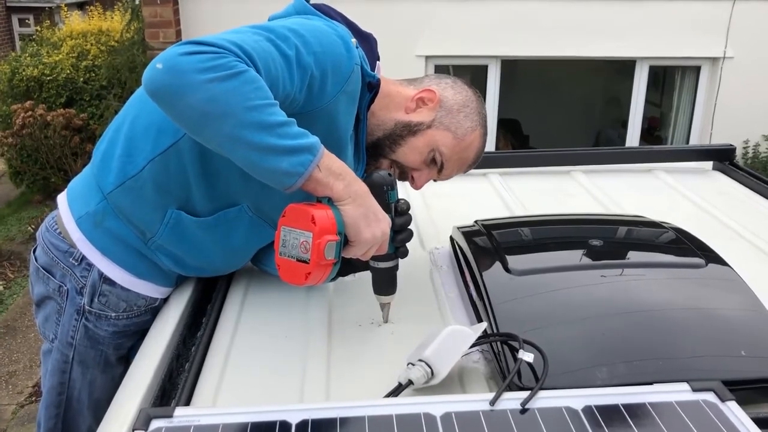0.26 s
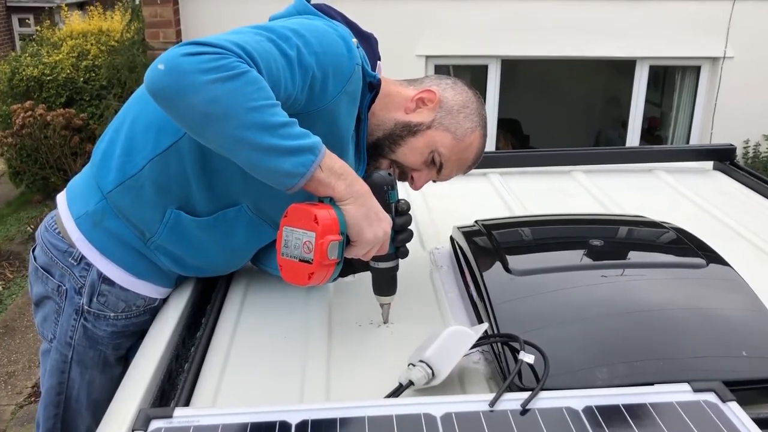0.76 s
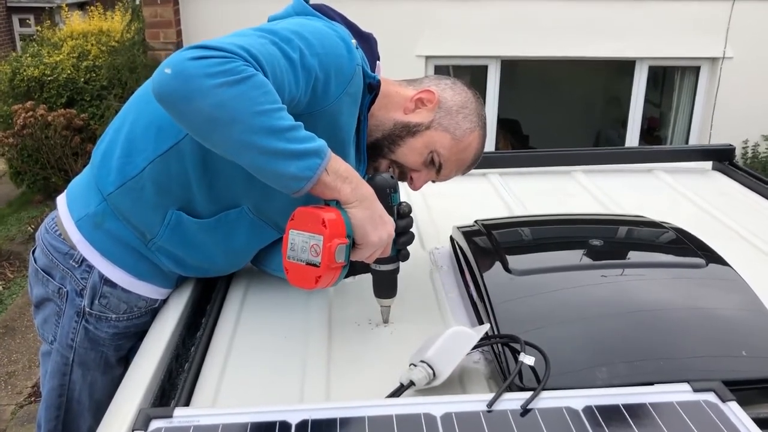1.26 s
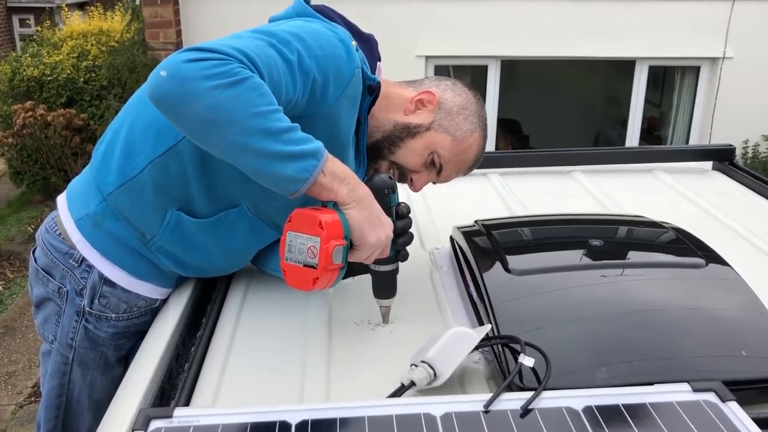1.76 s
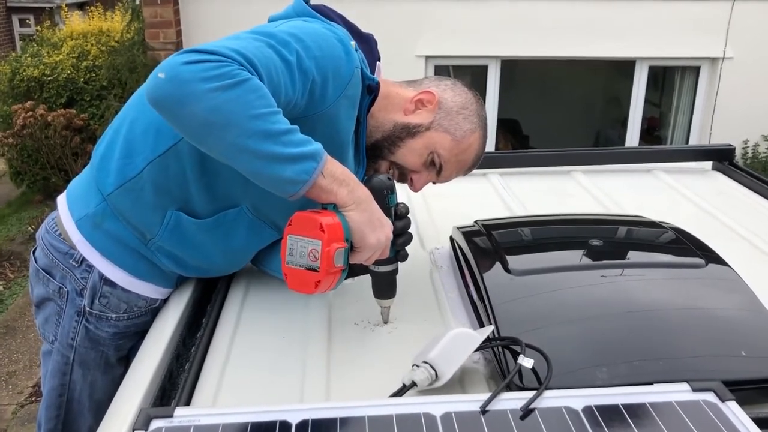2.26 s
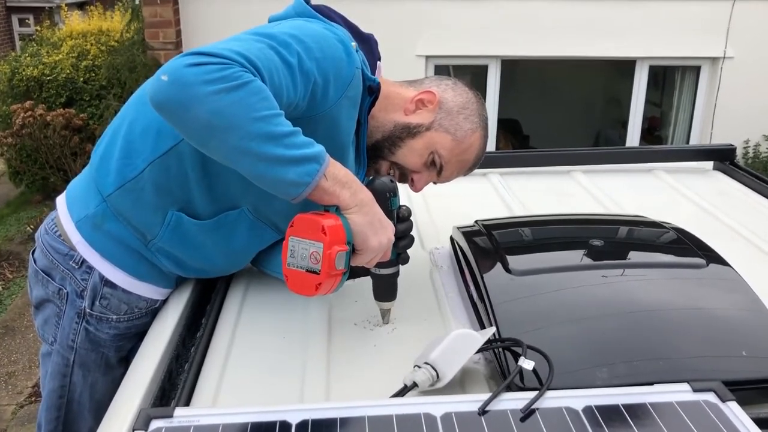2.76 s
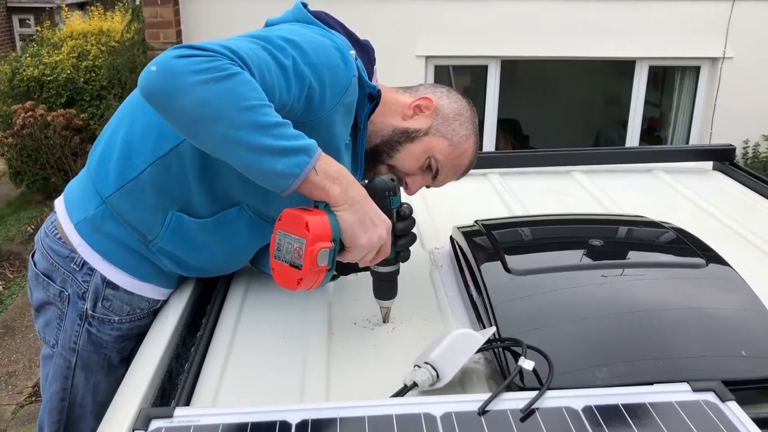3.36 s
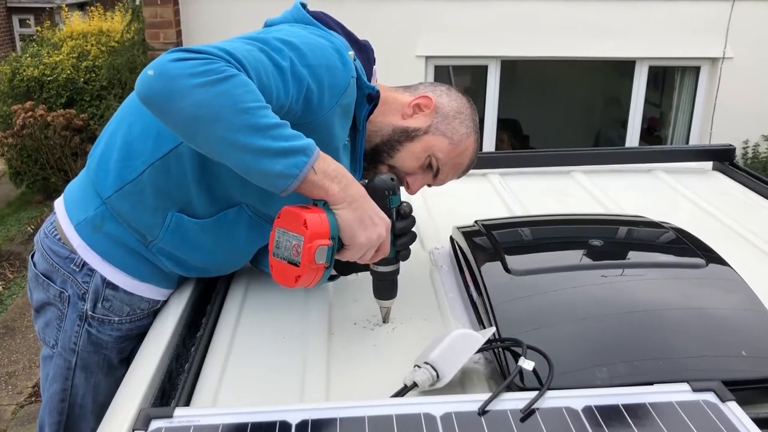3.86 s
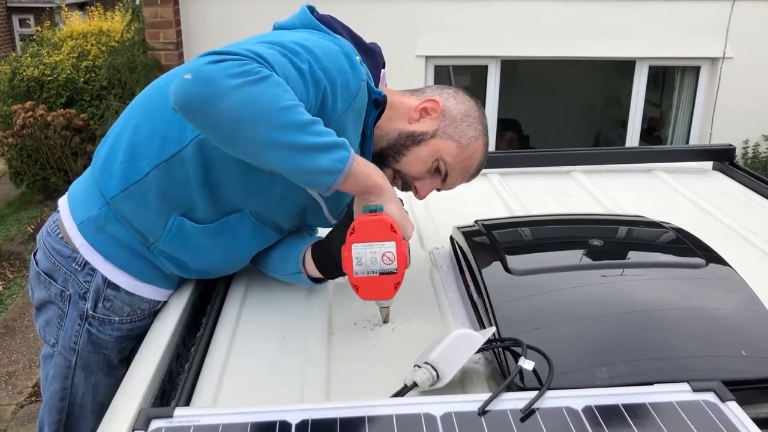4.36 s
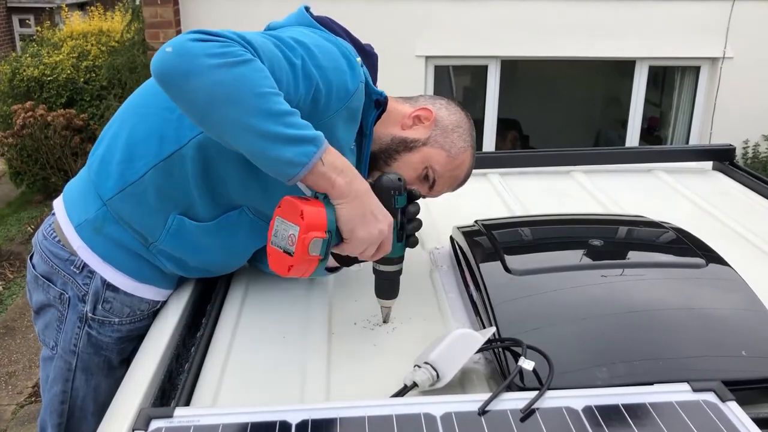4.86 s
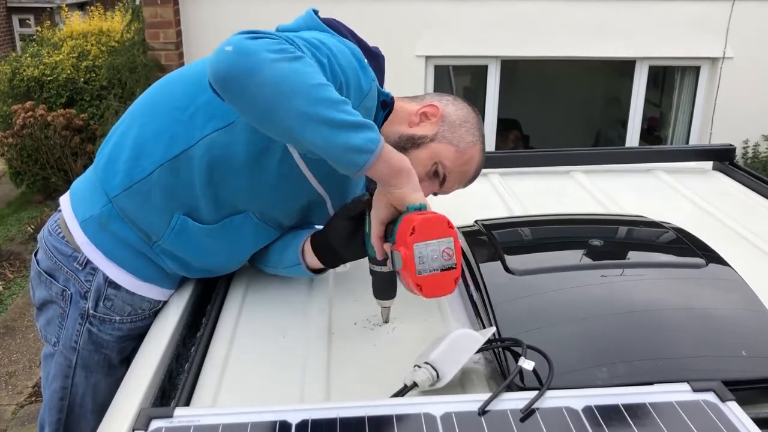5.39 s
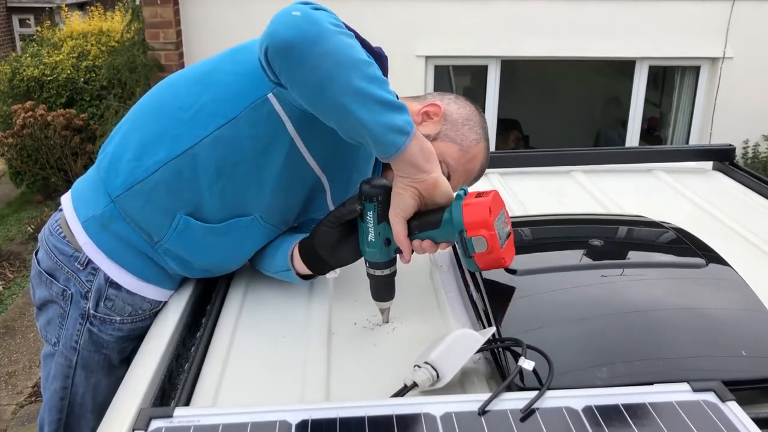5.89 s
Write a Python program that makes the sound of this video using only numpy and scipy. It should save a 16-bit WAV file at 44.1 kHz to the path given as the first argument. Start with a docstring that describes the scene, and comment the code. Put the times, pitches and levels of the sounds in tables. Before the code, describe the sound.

A cordless drill whines and grinds through a booming sheet-steel roof, snagging twice, then stops; a bird sings as the stuck bit knocks and scrapes.

```python
"""First a cordless drill drives a stepped bit through a steel van roof: its gears whine as wavering mesh
tones, the cut grinds as noise made of chips, and the panel booms through resonances struck by the flutes.
It stalls twice as a step snags, near 1.1 s and 2.7 s, then stops at 3.06 s. Afterwards the bit is twisted
free with thumps of decaying-pitch-free sine bursts and scrapes of noise, while a songbird sings in gliding
sine notes. A distant wash of traffic, shaped noise with thin tones, lies under it all."""
import sys
import numpy as np
from scipy import signal
from scipy.fft import rfft, irfft
from scipy.io import wavfile
from scipy.ndimage import uniform_filter1d

SR = 44100
rng = np.random.default_rng(int(sys.argv[2]) if len(sys.argv) > 2 else 0)


def pcm_store(signal):
    """Save signal as 16-bit PCM."""
    levels = np.round(np.clip(np.atleast_2d(signal), -1, 1) * 32767)
    wavfile.write(sys.argv[1], SR, levels.astype(np.int16).T)


N = 270333

# Colour of the distant traffic. Each row: frequency in Hz, relative level in dB per Hz.
TRAFFIC_SPECTRUM = [(25, -35), (49, -3), (117, -6), (170, 0), (326, -14.5), (560, -14.5), (780, -12),
                    (1050, -12.5), (1350, -13.5), (2200, -17.5), (2800, -22), (5000, -27), (8000, -39),
                    (16000, -59.5)]
# Thin far tones. Each row: frequency in Hz, mean peak level in dB against the wash.
FAR_TONES = [(549.1, -14.5), (694.4, -17), (952.8, -13.5), (990.5, -12), (1061, -11), (1098, -18.5),
             (1136, -7.5), (1174, -12), (1540, -15), (1830, -22), (2159, -13.5)]
# Slow fader of the traffic. Each row: time in seconds, mean level in dB.
TRAFFIC_LEVEL = [(3.2, -62.5), (3.62, -66), (4.24, -63), (4.91, -62), (5.39, -62), (5.7, -66), (6.13, -71)]
# Bird notes. Each row: start in seconds, length in seconds, start, middle and end pitch in Hz,
# mean peak level in dB, buzz depth in Hz.
BIRD_NOTES = [(3.239, 0.03, 4280, 4330, 4190, -75, 100), (3.29, 0.025, 4260, 4150, 3900, -64, 100.6),
              (3.894, 0.1, 4470, 4730, 4690, -67.5, 58.2), (4.064, .09, 5290, 5100, 5200, -64, 497),
              (4.087, .012, 5990, 6800, 7450, -67, 80), (4.102, 0.021, 7500, 6500, 5860, -51.5, 60.3),
              (4.12, 0.044, 3950, 4170, 4130, -66, 60), (4.177, 0.022, 4730, 4340, 3800, -59, 100),
              (4.201, 0.039, 6020, 5840, 6140, -55.5, 40), (4.233, 0.033, 5940, 5260, 5240, -49, 150),
              (4.258, 0.058, 5300, 5490, 5350, -51.5, 350), (4.315, 0.03, 5330, 6000, 5230, -51, 352),
              (4.334, 0.026, 5500, 6300, 5520, -56, 451), (4.37, 0.06, 5800, 5800, 6200, -65, 351),
              (4.417, .02, 3810, 3390, 3020, -75, 80), (4.447, 0.013, 3900, 3475, 2990, -72, 79.2),
              (4.552, 0.017, 3850, 3480, 3030, -62, 60.4), (4.572, .015, 4450, 3770, 3200, -60, 60),
              (4.614, 0.014, 4080, 4280, 4400, -62, 60.3), (4.618, 0.08, 3440, 3300, 3340, -65, 150),
              (4.658, 0.0071, 3700, 4600, 5300, -46.5, 60), (4.661, 0.071, 5280, 5280, 5380, -45.5, 59.3),
              (4.695, 0.01, 5140, 4340, 3580, -44, 60), (4.705, 0.074, 5100, 4900, 5050, -50, 493),
              (4.718, 0.032, 3590, 4180, 4870, -46, 60), (4.74, 0.016, 3750, 4850, 3700, -34.5, 60),
              (4.792, 0.03, 4710, 4740, 4700, -58, 251), (4.883, 0.0148, 5880, 7000, 7400, -46, 60),
              (4.903, 0.019, 7500, 7600, 7600, -56, 100), (4.917, 0.0062, 5730, 6650, 7560, -39, 60),
              (4.885, 0.049, 3600, 3380, 3520, -55, 250), (4.989, 0.016, 4180, 4760, 3790, -57, 60.6),
              (5.005, .04, 3710, 4330, 4090, -45.5, 60), (5.037, 0.011, 4360, 4270, 3680, -43.5, 60.3),
              (5.083, .016, 3070, 3700, 4400, -58.5, 30), (5.092, 0.016, 4440, 3880, 2930, -62, 30),
              (5.192, 0.015, 5570, 5400, 5800, -54.5, 99.3), (5.201, 0.11, 5510, 5390, 5200, -44, 40.3),
              (5.892, 0.028, 3980, 4170, 4120, -72, 59.4), (5.948, 0.074, 3610, 3350, 3520, -62, 250)]
# The panel pops or is bumped. Each row: start in seconds, level in dB, length in seconds, pitch in Hz.
THUMPS = [(1.081, -19, 0.032, 118), (1.108, -37.5, 0.13, 62.4), (1.28, -30.5, 0.068, 123.5),
          (2.702, -16.5, 0.04, 130.5), (2.725, -36, 0.066, 70.6), (3.38, -57, 0.053, 200),
          (4.71, -37, 0.052, 225), (4.885, -54.5, 0.043, 202), (5.27, -60, 0.044, 151),
          (6.07, -61.5, 0.076, 123.3)]
# The stuck bit scrapes in its hole. Each row: start in seconds, level at the start of its fade in dB,
# length in seconds.
SCRAPES = [(4.705, -45, 0.016), (4.709, -50.5, 0.1), (4.898, -56.5, 0.066), (5.214, -60.5, 0.13)]

# Mix of the roof panel. Each row: time in seconds, boom in dB, low flex in dB, rattle in dB.
ROOF_LEVELS = [(0.0, -24, -57, -41.5), (0.3, -24, -45.5, -36), (0.45, -29, -42, -34),
               (0.48, -27.5, -29, -38), (0.71, -25.5, -35, -39), (0.85, -30.5, -26.5, -38.5),
               (1.06, -40, -46, -46.5), (1.2, -33, -47.5, -48.5), (1.5, -30.5, -52.5, -44),
               (2.0, -30, -46, -41), (2.2, -31, -29.5, -47), (2.5, -30.5, -43, -43), (2.75, -41, -48, -52),
               (2.85, -35.5, -41, -49), (3.06, -36, -48.5, -47.5)]
# The bit jerks and the panel rings out. Each row: time in seconds, boom swell in dB, rattle swell in dB.
JOLTS = [(1.162, 10.5, -14), (1.262, 6.5, 8), (1.502, 8.5, 11.5), (1.588, 5, 10), (1.71, 2.5, 8.5),
         (1.82, 7.5, 5.5), (1.945, 6, -1), (2.018, 13, -3), (2.09, 2, 18), (2.125, 5.5, 2.5),
         (2.224, 7.5, -7.5), (2.26, 2, 17.5), (2.355, 1.5, 12.5), (2.821, 3.5, 14)]
# How regular the knocking is. Each row: time in seconds, share from 0 to 1.
STEADINESS = [(0, .93), (1, .9), (1.1, .6)]
# Slow flexing of the sheet. Each row: mode in Hz, pole width in Hz, relative level in dB.
FLEX_MODES = [(114, 27, -16), (163.5, 24, -8), (233, 89, 13.5)]
# Chatter of the sheet. Each row: mode in Hz, pole width in Hz, relative level in dB.
RATTLE_MODES = [(898, 100, -3), (950, 63, 1), (1069, 50, 3.5), (1316, 79, -7.5), (1540, 67, -9.5)]
# The panel's second mode. Each row: time in seconds, centre in Hz, level in dB against the low mode.
SECOND_MODE = [(0, 604, -6.5), (1.0, 558, -5), (1.15, 600, -7.5), (2.1, 614, -8.5), (3.06, 586, -5)]
# Wide shudder of the van body. Each row: frequency in Hz, relative level in dB per Hz.
RUMBLE_SPECTRUM = [(30, -40.5), (60, -17), (120, -1.5), (450, -8.5), (900, -10), (1500, -22)]

# The cut goes quiet in each stall. Each row: time in seconds, grinding in dB, swarf sizzle above it in dB.
CUT_LEVELS = [(0.0, -21.5, -16), (1.0, -23, -11), (1.04, -27.5, -15), (1.3, -25.5, -10), (1.48, -24, -10),
              (1.62, -22, -5.5), (1.98, -20, -2), (2.46, -24, -7.5), (2.61, -26.5, -2.5),
              (2.67, -28.5, -13.5), (2.81, -27.5, -5), (3.0, -23, -7.5), (3.06, -33.5, -25.5)]
# Colour of the grinding. Each row: frequency in Hz, relative level in dB per Hz.
GRIND_SPECTRUM = [(700, -24), (1260, -17.5), (1580, -16.5), (2200, -17.5), (2400, -7), (2840, 0),
                  (3110, -4.5), (3550, -8), (4500, -2), (5400, -8), (6300, -2), (7400, -6), (9000, -15.5),
                  (12300, -20.5), (16000, -23)]
# Colour of the swarf sizzle. Each row: frequency in Hz, relative level in dB per Hz.
SIZZLE_SPECTRUM = [(9000, -18), (10500, -6), (12500, -21), (14000, -7.5), (15000, 2), (16000, -1)]
# Hardest catches of the edge. Each row: start in seconds, surge size in dB against a push of 1,
# fall time in seconds.
BITES = [(0.36, 2, 0.006), (0.621, -2, 0.019), (0.654, -3.5, 0.0087), (0.704, -4, 0.02),
         (0.798, -4.5, 0.014), (0.979, -8, 0.026), (1.148, -6, 0.015), (1.235, 6.5, 0.01),
         (1.273, -3.5, 0.012), (1.322, 5.5, 0.026), (1.445, -6.5, 0.0098), (1.487, 4.5, 0.022),
         (1.544, 5, 0.01), (1.561, 2, 0.019), (1.688, -4, 0.023), (1.728, -2.5, 0.026), (1.787, -2, 0.012),
         (1.817, 3.5, 0.0061), (1.874, 0.5, 0.0097), (1.97, -4, 0.019), (2.043, -2, 0.02),
         (2.15, -0.5, 0.031), (2.253, 3.5, 0.0084), (2.293, -4.5, 0.014), (2.343, 3.5, 0.015),
         (2.492, -2.5, 0.017), (2.536, 0.5, 0.03), (2.589, 6, 0.016), (2.812, 15.5, 0.0077),
         (2.845, 3.5, 0.017), (3.042, 6.5, 0.015)]
# The edge skips free and the tearing dips. Each row: time in seconds, depth in dB.
LULLS = [(1.475, -4), (1.562, -5), (1.686, -7.5), (1.77, -3.5), (1.862, -10), (1.95, -10), (2.035, -8),
         (2.125, -3.5), (2.195, -4.5), (2.285, -3), (2.8, -2.5), (3.03, -8)]

# The gearbox sags under load, stalls twice with a rebound and hunts before the second stall.
# Each row: time in seconds, mesh pitch in Hz, basic whine level in dB.
GEARS = [(0.0, 4705, -25.5), (0.77, 4028, -28), (0.99, 3735, -43), (1.04, 2566, -23), (1.065, 2351, -30.5),
         (1.085, 2622, -33.5), (1.11, 2956, -27.5), (1.14, 2763, -28.5), (1.17, 3131, -32),
         (1.23, 3641, -32), (1.38, 4196, -27.5), (1.48, 4330, -27.5), (1.7, 4192, -27), (2.05, 4122, -31.5),
         (2.13, 3950, -39), (2.34, 3773, -38.5), (2.39, 3227, -36), (2.43, 3674, -32), (2.45, 3190, -33),
         (2.49, 3580, -33), (2.51, 3350, -36), (2.54, 3560, -32), (2.59, 3501, -37.5), (2.64, 2815, -27.5),
         (2.675, 1990, -27), (2.69, 2080, -28), (2.718, 2868, -29), (2.76, 2652, -28.5), (2.8, 3338, -38.5),
         (2.86, 4115, -31), (2.97, 4890, -28.5), (3.05, 4676, -57)]
# Speed ripple at each stroke of a flute. Each row: time in seconds, share of the pitch.
STROKE_RIPPLE = [(0, .005), (1, .006), (1.2, .014), (2.1, .016), (2.4, .008), (3.06, .005)]

JOLT_S, LULL_S = 0.022, 0.009  # half widths
LOW_MODE = (323, 45.2, 0)  # Hz, pole width Hz, dB
SECOND_WIDTH_HZ, SECOND_WANDER_HZ = 83, 14  # it wanders once the bit knocks irregularly
BITE_RISE_S = 0.0042
# Every stroke of a flute catches a little: size, random spread, fall time
STROKE_BITE_DB, STROKE_SPREAD_DB, STROKE_BITE_S = -20, 3.5, 0.014
TEETH_PER_STROKE = 172  # gear teeth that pass between two strokes of a flute
HALF_ORDER_DB = -50  # basic level of the tone at half the mesh pitch
UPPER_ORDER_DB = -11  # tone at 1.5 times the mesh pitch, against the whine
BAND_EDGE_HZ = 15850


def amp(db):
    """Decibels to linear gain."""
    return 10 ** (np.asarray(db) / 20)


def evened(x):
    """Brings a sound to rms 1."""
    return x / np.sqrt(np.mean(x ** 2) + 1e-20)


def curves(rows):
    """Every column of a table after the first, joined by straight lines in time."""
    s, *columns = np.transpose(rows)
    return [np.interp(np.arange(N) / SR, s, column) for column in columns]


def humps(rows, width):
    """A bell of the given half width (to 1/e) at each row's time, for every dB column."""
    s, *columns = np.transpose(rows)
    t = np.arange(0, N, 32) / SR  # a coarse grid is enough for slow bells
    bells = np.exp(-((t - s[:, None]) / width) ** 2)
    return [np.interp(np.arange(N) / SR, t, db @ bells) for db in columns]


def drift(cutoff_hz):
    """Slow random wander of rms 1: noise below a cutoff."""
    return evened(signal.lfilter(*signal.butter(2, cutoff_hz, fs=SR), rng.standard_normal(N)))


def swell(length, rise):
    """Envelope with rounded ends; rise is the share of the length spent on them."""
    return signal.windows.tukey(max(round(length * SR), 8), np.clip(rise, 0, 1))


def add(mix, s, sound):
    """Lays a sound into the mix at a time in seconds."""
    part = mix[round(s * SR):][:len(sound)]
    part += sound[:len(part)]


def coloured(x, points):
    """Shapes a sound by a spectrum, then brings it to rms 1."""
    hz, db = np.transpose(points)
    f = np.fft.rfftfreq(len(x), 1 / SR)
    gain = amp(np.interp(np.log(f + 1), np.log(hz), db, left=-70))
    return evened(irfft(rfft(x) * gain, len(x)))


def ring(x, modes):
    """Each mode shifts its pitch down to zero, smooths twice and shifts back: it swells, then dies."""
    out = np.zeros(N)
    for hz, width, db in modes:
        turn = np.exp(2j * np.pi * np.cumsum(hz * np.ones(N)) / SR)
        r = np.exp(-np.pi * width / SR)
        smooth = signal.lfilter([(1 - r) ** 2], [1, -2 * r, r * r], x / turn)
        out += amp(db) * (turn * smooth).real
    return evened(out)


def echoes(x, t60, start):
    """Sparse reflections of random sign from walls and hedges, decaying 60 dB in t60 seconds."""
    t = np.arange(SR // 2) / SR
    signs = rng.choice([-1., 1.], len(t))
    sparse = rng.random(len(t)) < .05
    taps = signs * sparse * amp(-60 * t / t60) * (t > start)
    return signal.fftconvolve(x, taps / np.linalg.norm(taps))[:N]


def garden():
    """A far wash of traffic, shaped noise, with a few thin tones that come and go."""
    t = np.arange(N) / SR
    wash = coloured(rng.standard_normal(N), TRAFFIC_SPECTRUM)
    tones = np.zeros(N)
    for hz, db in FAR_TONES:
        tones += amp(db + 4 * drift(2)) * np.sin(2 * np.pi * hz * t + .8 * drift(3))
    return amp(curves(TRAFFIC_LEVEL)[0] + 1.7 * drift(11)) * (wash + tones)


def bird():
    """Whistled notes, each gliding through three pitches, some buzzy, with a faint octave."""
    out = np.zeros(N)
    buzz = np.tanh(drift(218))
    for s, length, *hz, db, depth_hz in BIRD_NOTES:
        shape = swell(length, 0.55)
        glide = np.polyval(np.polyfit([0, .5, 1], hz, 2), np.linspace(0, 1, len(shape)))
        pitch = glide + depth_hz * buzz[round(s * SR):][:len(shape)]
        turn = 2 * np.pi * np.cumsum(pitch) / SR
        add(out, s, amp(db) * shape * (np.sin(turn) + amp(-35.5) * np.sin(2 * turn)))
    return out * amp(2.0 * drift(116))


def thumps():
    """Short low sounds of the panel: three inharmonic partials under one swell."""
    out = np.zeros(N)
    for s, db, length, hz in THUMPS:
        shape = swell(length, 0.55)
        turn = 2 * np.pi * hz * np.arange(len(shape)) / SR
        partials = np.sin(turn) + .5 * np.sin(1.42 * turn) + 0.26 * np.sin(0.61 * turn)
        add(out, s, amp(db) * shape * partials)
    return out


def scrapes():
    """The jammed bit rubs in its hole: brief slices of noise weighted to the lows."""
    out = np.zeros(N)
    rub_spectrum = [(300, 21.5), (1200, 6), (7000, 0), (10000, -17), (16000, -11)]  # Hz, dB per Hz
    rub = coloured(rng.standard_normal(N), rub_spectrum)
    for s, db, length in SCRAPES:
        shape = swell(length, 0.49)
        shape *= np.linspace(1, .3, len(shape))  # each scrape dies away
        add(out, s, amp(db) * shape * rub[round(s * SR):][:len(shape)])
    return out


def strokes():
    """1 at each moment a flute of the bit comes round to the rim of the hole."""
    turns = np.cumsum(curves(GEARS)[0]) / SR / TEETH_PER_STROKE
    return np.diff(np.floor(turns), prepend=-1)


def knocking():
    """One blow at each stroke, of varying strength."""
    return evened(strokes() * amp(2.0 * drift(30)))


def roof(push):
    """Blows and chatter of the bit ring the modes of the sheet steel; low modes follow more loosely."""
    boom_db, flex_db, rattle_db = curves(ROOF_LEVELS)
    boom_swell_db, rattle_swell_db = humps(JOLTS, JOLT_S)
    steady = curves(STEADINESS)[0]
    blows = knocking()

    def excitation(share):
        """Regular blows mixed with noise at constant power."""
        return share * blows + np.sqrt(1 - share ** 2) * rng.standard_normal(N)

    tight, loose = excitation(steady), excitation(0.59 * steady)
    second_hz, second_db = curves(SECOND_MODE)
    second_hz = second_hz + SECOND_WANDER_HZ * (1 - steady ** 2) * drift(12)
    second = ring(tight, [(second_hz, SECOND_WIDTH_HZ, 0)])
    boom = ring(loose, [LOW_MODE]) + amp(second_db) * second
    rumble = amp(-7.5) * coloured(rng.standard_normal(N), RUMBLE_SPECTRUM)
    flex = ring(loose, FLEX_MODES)
    chatter = np.sqrt(push) * rng.standard_normal(N)
    rattle = ring(chatter + .5 * tight, RATTLE_MODES)
    sheet = amp(boom_db + boom_swell_db) * (boom + rumble)
    sheet += amp(flex_db + 3.0 * drift(11)) * flex
    sheet += amp(rattle_db + rattle_swell_db) * rattle
    # thin sheet radiates no deep bass
    return signal.lfilter(*signal.butter(2, 95, "high", fs=SR), sheet)


def surge(fall_s):
    """One catch of the edge: a quick straight rise under a bell-shaped fall."""
    t = np.arange(4000) / SR
    return np.minimum(t / BITE_RISE_S, 1) * np.exp(-(t / max(fall_s, .002)) ** 2)


def force():
    """How hard the edge tears: a restless push, small surges at strokes, others at bites, brief lulls."""
    sizes = strokes() * amp(STROKE_BITE_DB + STROKE_SPREAD_DB * drift(30))
    bites = signal.oaconvolve(sizes, surge(STROKE_BITE_S))[:N]
    for s, db, fall_s in BITES:
        add(bites, s, amp(db) * surge(fall_s))
    restless = 0.69 * amp(2.0 * drift(80))
    return (restless + bites) * amp(humps(LULLS, LULL_S)[0])


def cutting(push):
    """Steel tears in small chips; a bite brightens the sound more than it swells it."""
    grind_db, sizzle_db = curves(CUT_LEVELS)
    chip_sizes = amp(2.2 * np.minimum(rng.exponential(1, N), 4))
    chips = chip_sizes * (rng.random(N) < 6000 / SR)  # about 6000 chips a second
    tear = rng.standard_normal(N) + 0.48 * evened(chips * rng.standard_normal(N))
    rasp = coloured(tear, GRIND_SPECTRUM)
    body = signal.filtfilt(*signal.butter(2, 4500, fs=SR), rasp)
    grind = push ** 0.55 * body + push * (rasp - body)  # the treble follows the push more closely
    flicker = amp(5.8 * drift(250))
    sizzle = amp(sizzle_db) * push ** 0.71 * flicker * coloured(tear, SIZZLE_SPECTRUM)
    return amp(grind_db) * (grind + sizzle)


def whine():
    """Gear mesh tones that sag under load and waver with each stroke of a flute."""
    hz, db = (uniform_filter1d(c, size=350) for c in curves(GEARS))  # rounds the corners over 8 ms
    stroke = 2 * np.pi * np.cumsum(hz) / SR / TEETH_PER_STROKE
    waver = .005 * drift(50) + curves(STROKE_RIPPLE)[0] * np.sin(stroke)
    turn = 2 * np.pi * np.cumsum(hz * (1 + waver)) / SR
    thin_db = np.clip((hz - 2500) / 40, -8, 0)  # the small housing radiates low pitches poorly
    broken_db = np.clip(11 - hz / 400, 1.5, 5) * drift(45)  # a slow, strained mesh breaks up
    mesh = amp(db + thin_db + broken_db + 2 * drift(150)) * np.sin(turn)
    half_load_db = np.clip((3900 - hz) / 100, -3, 1)  # the half order is stronger at low pitch
    half_level = amp(HALF_ORDER_DB + half_load_db + 4 * drift(30))
    half = half_level * np.sin(turn / 2 + .4 * drift(60))
    laboured_db = np.clip((3000 - hz) / 100, -10, 0)  # the upper order grows as the motor labours
    upper = amp(db + UPPER_ORDER_DB + laboured_db + 4 * drift(20)) * np.sin(3 * turn / 2)
    return np.sqrt(2) * (mesh + half + upper)  # sine levels count as rms


def running():
    """1 while the trigger is held; the brake stops the chuck within 11 ms."""
    return np.clip((3.062 - np.arange(N) / SR) / 0.011, 0, 1)


def scene():
    """Garden, bird and loose knocks under the drill, with echoes on the drill and the bird."""
    push = force()
    drill = (whine() + cutting(push) + roof(push)) * running()
    song = bird()
    near = drill + amp(-14) * echoes(drill, .1, .004)
    far = song + amp(-1.5) * echoes(song, .21, .006)
    return (near + thumps() + scrapes() + far + garden())[None]


def record(dry):
    """Removes everything above the band edge with a steep linear-phase lowpass."""
    lowpass = signal.firwin(511, BAND_EDGE_HZ, window=("kaiser", 9), fs=SR)
    return signal.oaconvolve(dry, lowpass[None], "same")


dry = scene()
out = record(dry)
pcm_store(out)
```